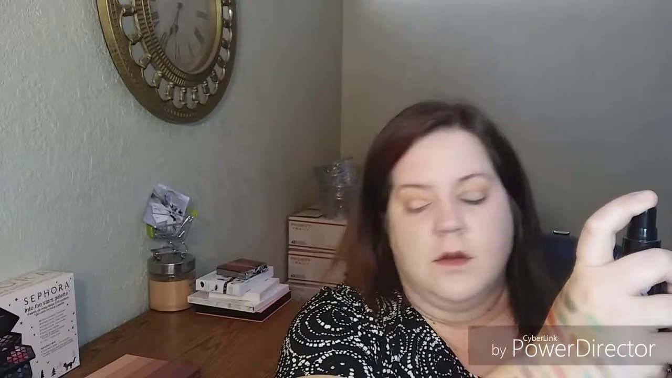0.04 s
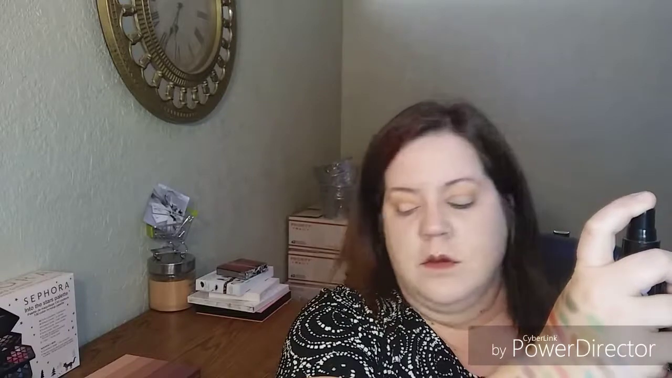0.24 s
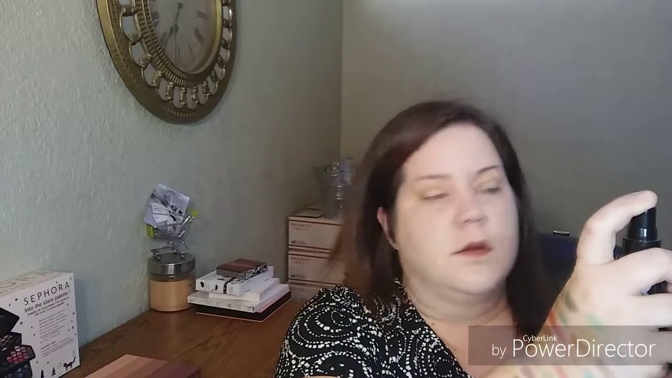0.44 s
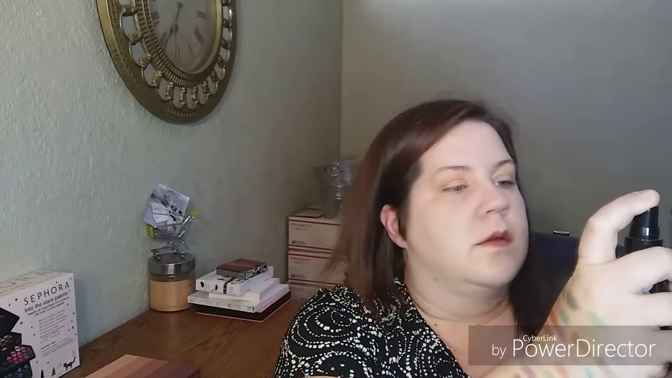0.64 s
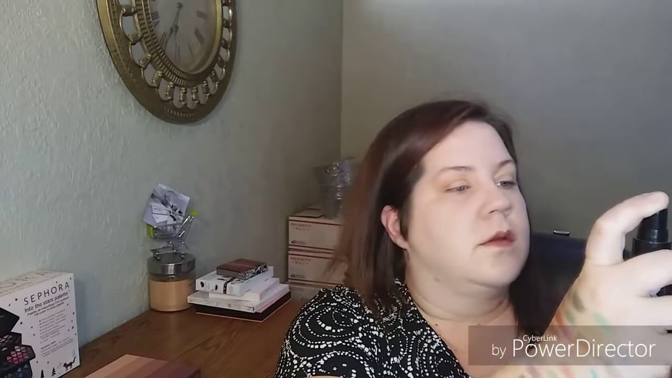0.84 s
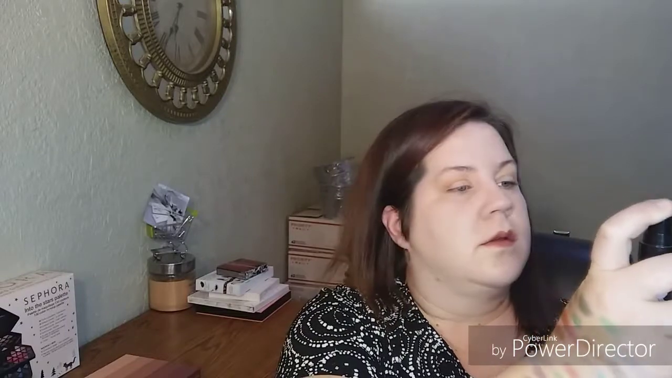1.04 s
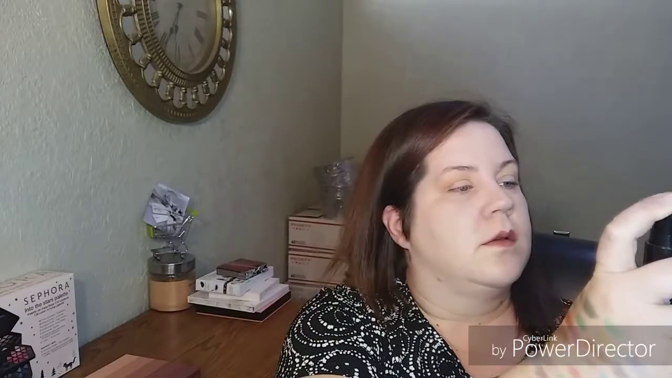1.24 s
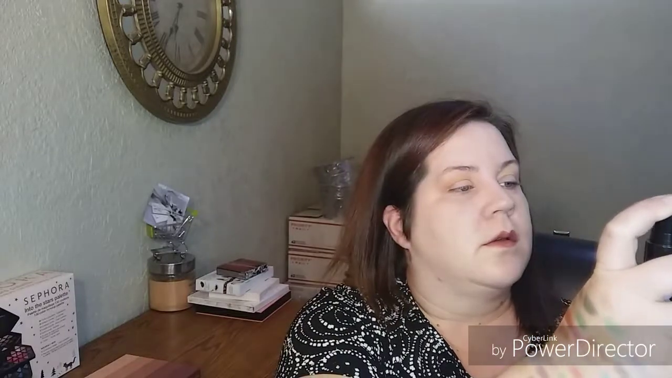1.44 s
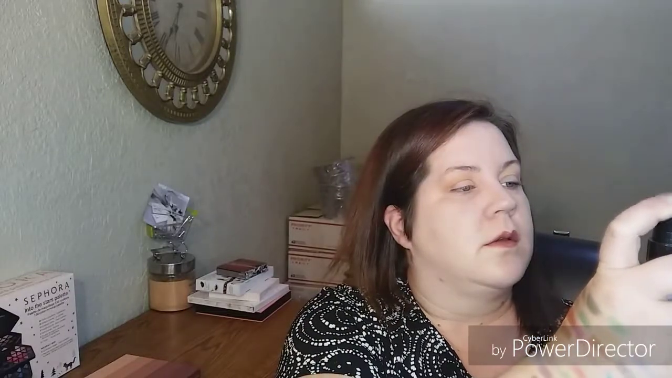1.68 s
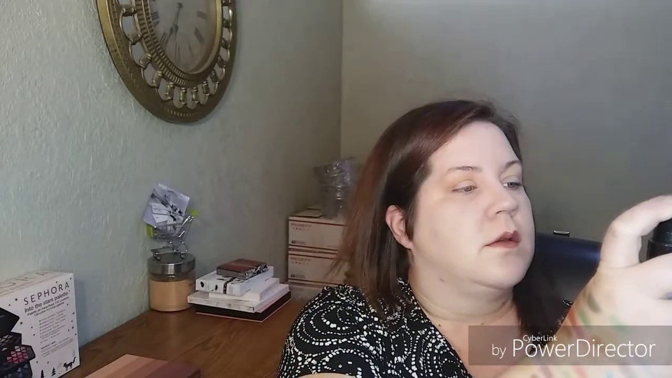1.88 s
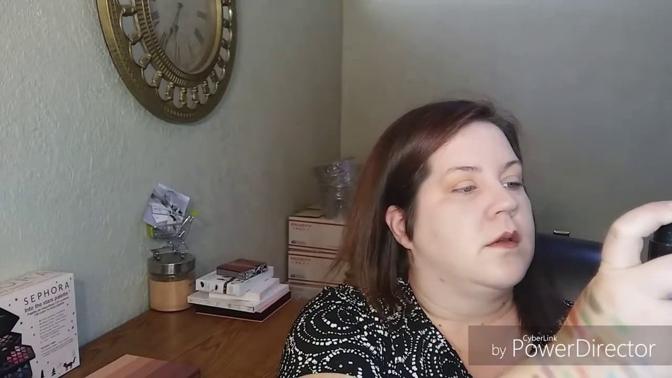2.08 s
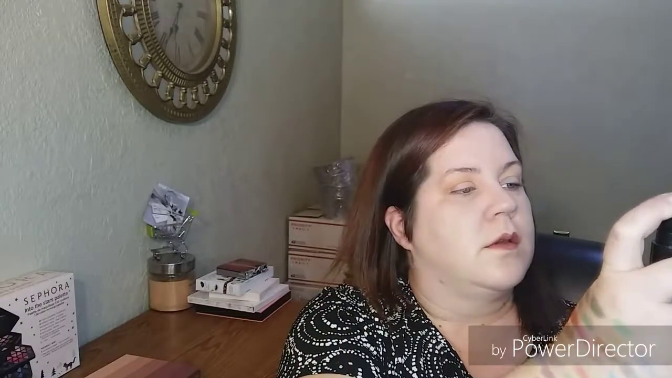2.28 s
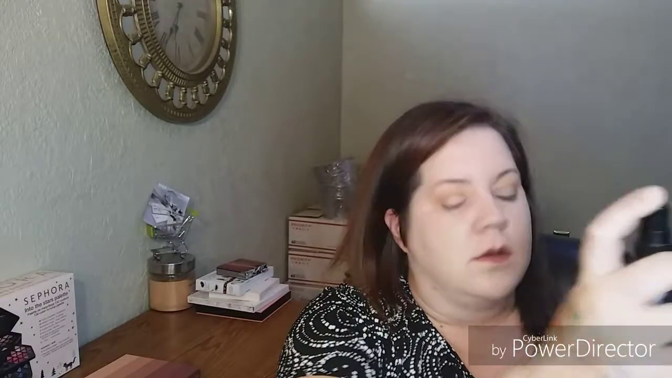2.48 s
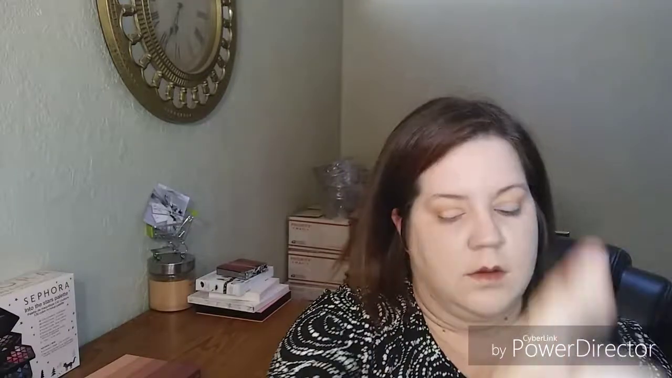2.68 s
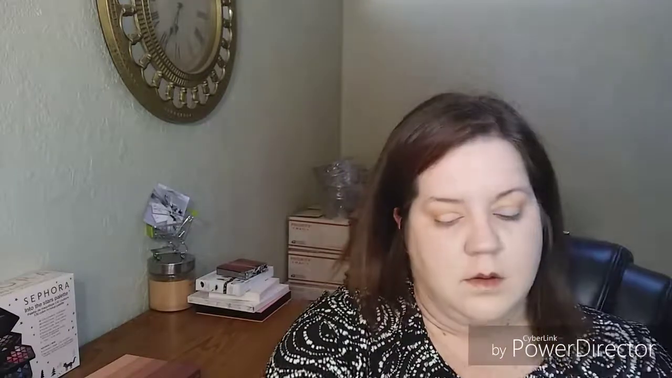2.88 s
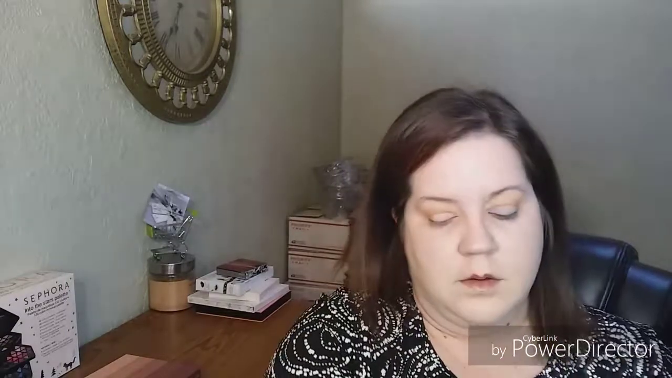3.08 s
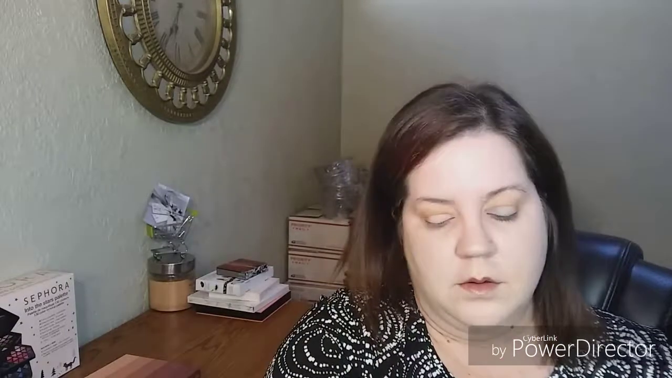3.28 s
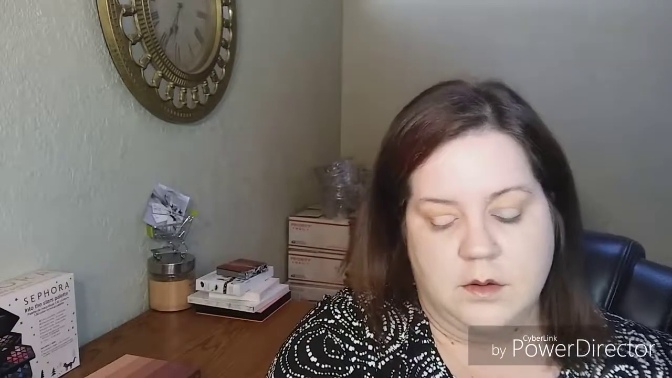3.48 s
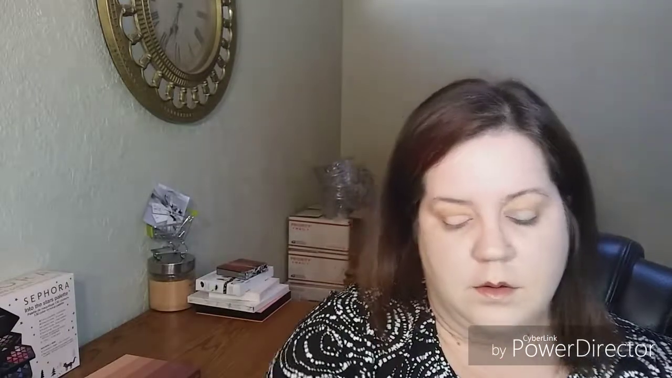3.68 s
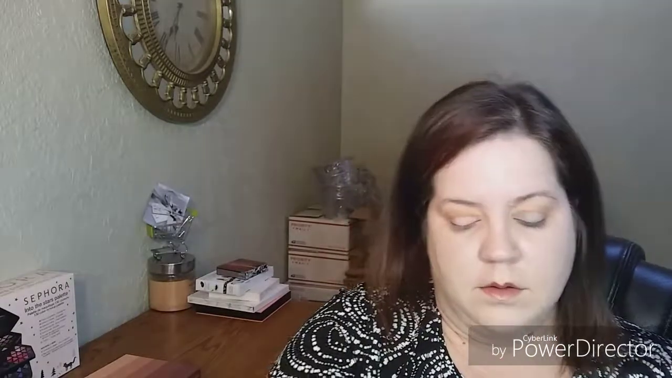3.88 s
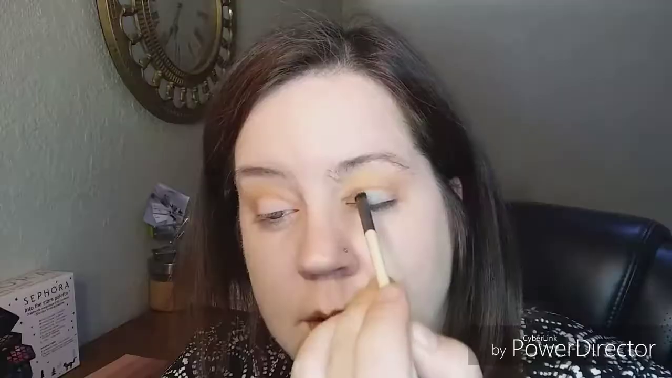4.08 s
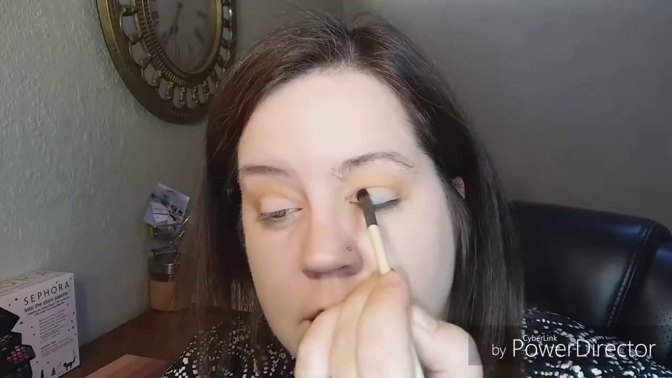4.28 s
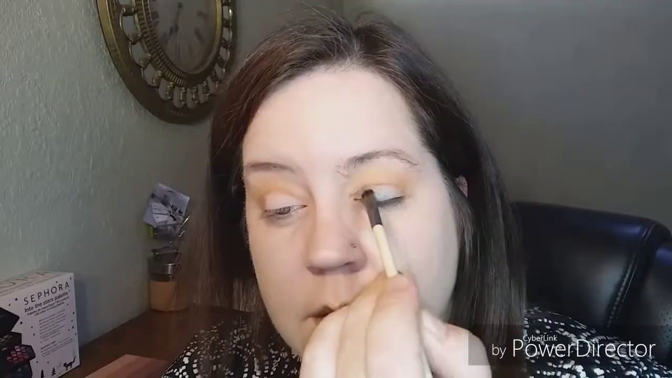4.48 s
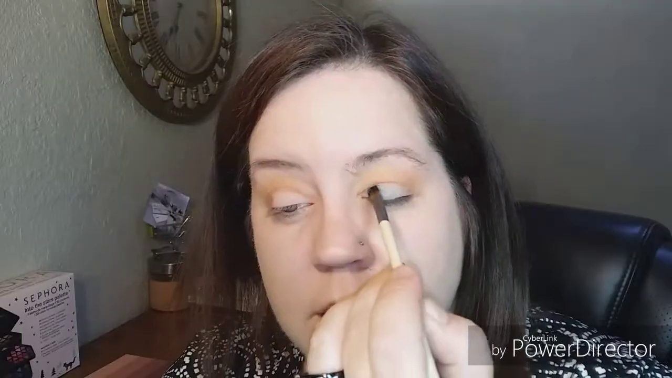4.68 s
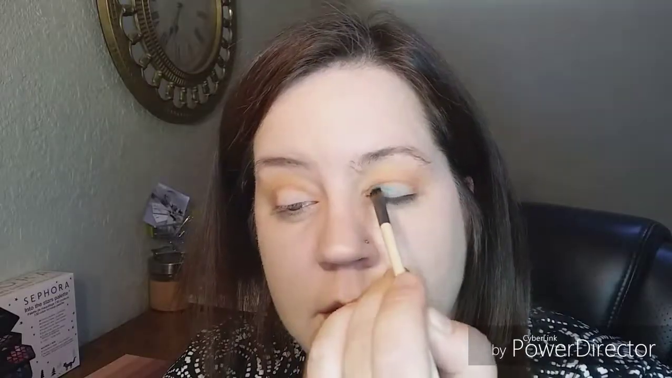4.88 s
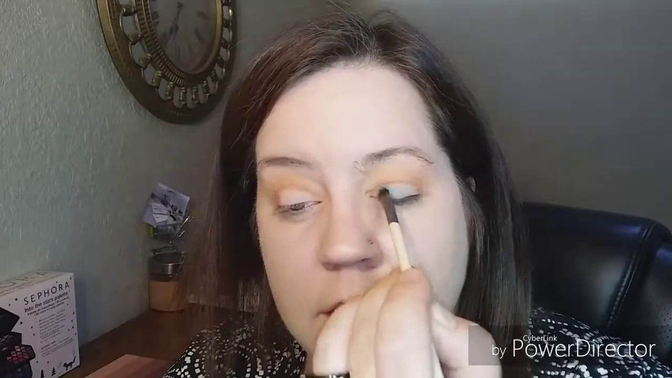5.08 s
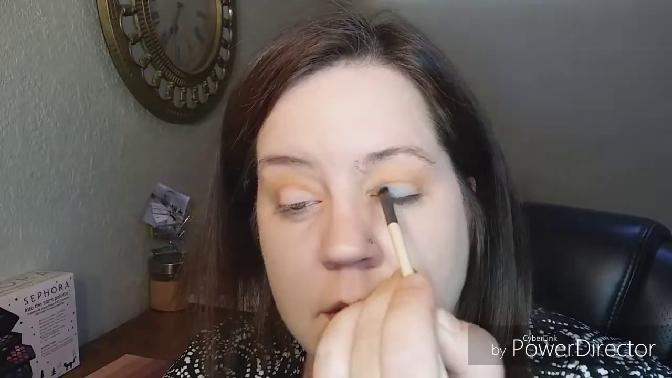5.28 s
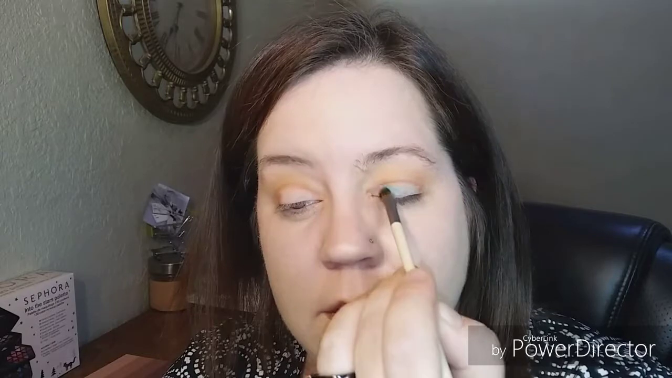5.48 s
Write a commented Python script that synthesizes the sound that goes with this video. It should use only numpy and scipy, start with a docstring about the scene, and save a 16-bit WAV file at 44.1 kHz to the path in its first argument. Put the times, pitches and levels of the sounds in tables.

```python
"""A small room hums steadily with mains and fan tones. Close by, a small pump bottle gives three quick squirts,
each a hissing jet from the nozzle; the first starts with a spit of trapped air. The plunger ticks between
strokes and fingers knock the plastic. The bottle is set down with a thump that rings a wooden desk, then
something scuffs over the wood, sliding and juddering to a stop. One dry, sharp click comes last. The sound is
mono."""
import sys
import numpy as np
from scipy import signal
from scipy.fft import rfft, irfft
from scipy.io import wavfile
from scipy.ndimage import uniform_filter1d

SR = 44100
rng = np.random.default_rng(int(sys.argv[2]) if len(sys.argv) > 2 else 0)


def bounce(signal):
    """Save signal as a 16-bit WAV file at the path given by the first command-line argument."""
    frames = np.transpose(np.atleast_2d(signal))
    limited = np.clip(frames, -1, 1)
    pcm = np.round(limited * 32767).astype(np.int16)
    wavfile.write(sys.argv[1], SR, pcm)


N = 243873
TIME = np.arange(N) / SR

# one row a pump stroke: valve_opens_s, valve_shuts_s, finger_lets_go_s, level_db
PUMP_STROKES = [(1.1075, 1.203, 1.293, -28), (1.572, 1.693, 1.761, -27.7), (1.983, 2.138, 2.206, -28)]
# tone colour of hard contact with the wood: freq_hz, level_db
WOOD_CONTACT = [(150, -8), (600, 11), (1000, 0.5), (1600, -1.5), (2400, -4.5), (3600, -5), (7500, -12),
                (9500, -30), (15000, -32)]


def gain_of(db):
    """Decibels to amplitude."""
    return 10 ** (np.asarray(db) / 20)


def unit_rms(x):
    """Scales to rms 1."""
    return x / np.sqrt(np.mean(abs(x) ** 2) + 1e-20)


def curve_at(points, hz):
    """Reads a curve on a log-frequency axis."""
    point_hz, value = np.transpose(points)
    return np.interp(np.log(hz + 1), np.log(point_hz + 1), value)


def add(mix, start_s, sound):
    """Mixes a sound in at start_s."""
    part = mix[round(start_s * SR):][:len(sound)]
    part += sound[:len(part)]


def noise(colour):
    """Noise of rms 1 with the given tone colour."""
    hz = np.fft.rfftfreq(N, 1 / SR)
    return unit_rms(irfft(rfft(rng.standard_normal(N)) * gain_of(curve_at(colour, hz)), N))


def drift(rate_hz):
    """Smooth random modulation of rms 1, moving at up to about rate_hz."""
    hz = np.fft.rfftfreq(N, 1 / SR)
    return unit_rms(irfft(rfft(rng.standard_normal(N)) / (1 + (hz / rate_hz) ** 4), N))


def ring(modes, tuning=1):
    """Decaying modes after one blow."""
    t = np.arange(SR // 2) / SR
    return sum(gain_of(db - 60 * t / t60) * np.sin(2 * np.pi * hz * tuning * t) for hz, db, t60 in modes)


def burst(start_s, db, decay_s):
    """Envelope that jumps up and dies away."""
    return gain_of(db) * (TIME >= start_s) * np.exp(-abs(TIME - start_s) / decay_s)


def gate(start_s, end_s, attack_s, release_s):
    """Envelope that rises, holds until end_s and dies away."""
    rise = 1 - np.exp(-np.maximum(TIME - start_s, 0) / attack_s)
    return rise * np.exp(-np.maximum(TIME - end_s, 0) / release_s)


def peak_eq(x, peaks):
    """Colours a sound with narrow peaks and notches."""
    hz = np.fft.rfftfreq(N, 1 / SR)
    eq_db = sum(lift * np.exp(-2 * ((hz - centre) / width) ** 2) for centre, width, lift in peaks)
    return irfft(rfft(x) * gain_of(eq_db), N)


def low_cut(x, corner_hz, order=4):
    """A small body radiates little below its corner frequency."""
    return signal.sosfilt(signal.butter(order, corner_hz, "highpass", fs=SR, output="sos"), x)


def room_tone(waver_hz=3.6):
    """Mains and fan tones, each wavering in level and phase, over soft air noise."""
    # moving air and microphone hiss: freq_hz, level_db
    air_colour = [(35, -21), (65, -7), (150, -5.5), (215, 0.5), (400, -2), (700, -6), (1100, -8.5),
                  (2500, -12.5), (5000, -14.5), (7300, -18), (8500, -24), (10500, -22.5), (13000, -19),
                  (15500, -19)]
    # thin whistles in the hiss: centre_hz, width_hz, lift_db
    whistles = [(6380, 200, 2.5), (7160, 200, 4.5)]
    # the tones of the hum: pitch_hz, level_db, waver_share
    hum_tones = [(60, -66.5, 0.1), (119.5, -62.5, 0.91), (195.2, -60, 0.68), (245.5, -60.5, 0.72),
                 (480.4, -64.5, 0.62), (543, -71, 0.9), (768, -75, 0.03), (1015, -71.5, 0.9)]
    out = gain_of(-51.5) * peak_eq(noise(air_colour), whistles) * gain_of(0.58 * drift(7.6))
    for hz, db, waver in hum_tones:
        sway = unit_rms(1 - waver + waver * (drift(waver_hz) + 1j * drift(waver_hz)))
        tone = np.exp(2j * np.pi * (hz * TIME + rng.random()))
        out += gain_of(db) * np.sqrt(2) * (sway * tone).real
    return out


def drone(pitch_hz=361.3, level_db=-58, waver_db=1.5, wobble_rad=0.79, swell_half_s=.11):
    """The hum's leading tone: it wavers in level and phase, and swells twice."""
    # swells of the tone: peak_s, rise_db
    swells = [(0.01, 8), (1.39, 7.5)]
    swell_db = sum(rise_db * np.exp(-((TIME - peak_s) / swell_half_s) ** 2) for peak_s, rise_db in swells)
    level = gain_of(level_db + swell_db + waver_db * drift(3))
    return level * np.sqrt(2) * np.sin(2 * np.pi * pitch_hz * TIME + wobble_rad * drift(3))


def room_reverb(x, wet_db, dull_hz):
    """A small room: sparse reflections, duller than the direct sound, each band dying at its own speed."""
    # the room's decay times: freq_hz, t60_s
    decay_times = [(150, 0.37), (600, 0.47), (2000, 0.8), (5500, 0.37), (9000, 0.54), (15000, 0.4)]
    reflections = rng.choice([-1., 1.], SR) * (rng.random(SR) < 4000 / SR)
    reflections *= np.arange(SR) > .004 * SR  # pre-delay
    hz, t, bands = signal.stft(reflections, SR, nperseg=256)
    bands = bands * gain_of(-60 * t / curve_at(decay_times, hz)[:, None])
    bright_tail = signal.istft(bands, SR, nperseg=256)[1]
    dull_tail = signal.istft(bands / np.hypot(1, (hz / dull_hz) ** 2)[:, None], SR, nperseg=256)[1]
    return gain_of(wet_db) * signal.fftconvolve(x, dull_tail / np.linalg.norm(bright_tail))[:N]


def sharp_click(start_s=4.0478, drive_db=7, cutoff_hz=10900):
    """One sharp spike, rounded off to a few samples wide."""
    spike = np.zeros(N)
    add(spike, start_s, np.array([-gain_of(drive_db)]))
    return signal.lfilter(*signal.butter(2, cutoff_hz, fs=SR), spike)


def desk_scuff(slide_s=3.508, grip_s=3.537, stop_s=3.585, grit_db=2.5, slips_per_s=900):
    """Something slides on the desk with a gritty rub, then sticks and slips, setting the wood droning."""
    # the modes that the judder rings: pitch_hz, level_db, t60_s
    judder_modes = [(183, -12.5, 0.2), (271.3, 2, 0.19), (321, -5, .1), (657, -6, 0.067)]
    rub = unit_rms(noise(WOOD_CONTACT) * gain_of(grit_db * drift(300)))
    slips = rng.standard_normal(N) * (rng.random(N) < slips_per_s / SR)
    judder = signal.oaconvolve(slips, ring(judder_modes))[:N]
    judder /= np.sqrt(abs(uniform_filter1d(judder ** 2, size=1100)) + 1e-9)  # the hand presses evenly
    rub_level = gain_of(-41.5) * gate(slide_s, grip_s + .018, attack_s=.002, release_s=.045)
    judder_level = gain_of(-31) * gate(grip_s, stop_s, attack_s=.007, release_s=.018)
    return rub_level * rub + judder_level * judder


def desk_thump():
    """The bottle's base hits the desk in a cluster of blows; a longer contact rings only the low modes."""
    # the bottle lands and rocks: start_s, body_db, contact_s, contact_noise_db
    blows = [(3.3370, -12, 0.00087, -29), (3.3398, -21, 0.00055, -33), (3.3488, -30, 0.00047, -30.5),
             (3.357, -25, 0.00034, -37), (3.3611, -17.5, 0.0023, -37), (3.3717, -24, 0.00089, -42)]
    # the desk's modes: pitch_hz, level_db, t60_s
    desk_modes = [(166, -22, .25), (207, -13, .17), (243, -9, .14), (283, -4, .09), (365, -4.5, .05),
                  (495, -5.5, .07), (595, -9, .06), (668, -7, .08)]
    out, contact_noise, wood = np.zeros(N), noise(WOOD_CONTACT), ring(desk_modes)
    t = np.arange(400) / SR
    for start_s, body_db, contact_s, noise_db in blows:
        push = np.sin(np.pi * np.minimum(t / contact_s, 1))
        add(out, start_s, gain_of(body_db) * np.convolve(wood, push / push.sum()))
        out += burst(start_s, noise_db, decay_s=0.0036) * contact_noise
    return out


def bottle_knocks(travel_s=.049, detune=0.025):
    """Plunger and fingers knock the hand-damped bottle, ringing it a little differently each time."""
    # finger ticks as the grip shifts: start_s, body_db, snap_db
    finger_ticks = [(1.120, -39, -55), (1.934, -35.5, -63), (1.943, -37.5, -66), (2.581, -55, -48),
                    (2.749, -41, -43), (2.772, -44, -49), (2.829, -60, -49.5)]
    # the bottle's modes: pitch_hz, level_db, t60_s
    bottle_modes = [(440, -12, .02), (570, -5, .025), (660, 0, .04), (780, -7, .02), (1250, -12, .015),
                    (1750, -10, .015), (2200, -8, .018), (3150, -15, .012)]
    # hard plastic snapping: freq_hz, level_db
    snap_colour = [(1000, -10), (3000, -5), (4700, 1), (7000, 2), (9000, -10), (14000, -10), (16000, -22)]
    knocks = list(finger_ticks)
    for opens_s, _, lets_go_s, _ in PUMP_STROKES:
        knocks.append((opens_s, -42.5, -44))  # the plunger is pressed,
        knocks.append((lets_go_s, -44.5, -57))  # let go,
        knocks.append((lets_go_s + travel_s, -45.5, -58))  # and hits the top of its travel
    out, snap = np.zeros(N), noise(snap_colour)
    for (start_s, body_db, snap_db), grip in zip(knocks, rng.uniform(-1, 1, len(knocks))):
        add(out, start_s, gain_of(body_db) * ring(bottle_modes, 1 + detune * grip))
        out += burst(start_s, snap_db, decay_s=0.01) * snap
    return out


def nozzle_spits():
    """Tiny, very high bursts as trapped air leaves the nozzle at the start of the first stroke."""
    # the fizz of a spit: freq_hz, level_db
    fizz_colour = [(7000, -46), (11000, -5), (13300, 2), (14500, 1), (15600, -20)]
    # one row an air bubble: start_s, level_db
    bubbles = [(1.1092, -33), (1.1188, -29), (1.1325, -26)]
    return noise(fizz_colour) * sum(burst(start_s, db, decay_s=0.0021) for start_s, db in bubbles)


def spray_jet(onset_db=-7, build_s=0.019, sag_db=-6, sag_s=.04, attack_s=0.0012, sputter_db=0.5):
    """The valve snaps open, pressure builds, then sags as the plunger bottoms out; the jet sputters."""
    # the hiss of the jet at the nozzle: freq_hz, level_db
    jet_colour = [(300, -57), (1000, -25.5), (1300, -23.5), (1550, -14.5), (2500, -19), (3200, -13),
                  (4100, -10), (4800, -3.5), (6700, -5), (7500, -8), (8900, -18.5), (11500, -16),
                  (13500, -15.5), (15500, -31)]
    flow = np.zeros(N)
    for opens_s, shuts_s, _, level_db in PUMP_STROKES:
        valve = gate(opens_s, shuts_s, attack_s, release_s=0.0025)
        dribble = 0.32 * gate(opens_s, shuts_s, attack_s, release_s=0.033)  # the last liquid fizzles out
        pressure_db = onset_db * np.exp(-np.maximum(TIME - opens_s, 0) / build_s)
        pressure_db += np.interp(TIME, [shuts_s - sag_s, shuts_s], [0, sag_db])
        flow += np.maximum(valve, dribble) * gain_of(level_db + pressure_db)
    return flow * noise(jet_colour) * gain_of(sputter_db * drift(240))


def scene():
    """Bottle and desk with their reverb, over the hum; the click stays dry. Both channels are the same."""
    # peaks and notches on the direct path from the nozzle: centre_hz, width_hz, lift_db
    nozzle_eq = [(2874, 120, 7.5), (3050, 130, 1), (3260, 180, 6.5), (4160, 110, -7), (5100, 350, 1.5),
                 (5480, 140, -7.5), (6600, 520, 5), (7470, 200, -7), (8300, 300, 3), (9640, 300, 7),
                 (10500, 250, 0), (11160, 460, 4.5), (12600, 600, 3.5)]
    # the clack of the bottle's base toward the listener: centre_hz, width_hz, lift_db
    clack_eq = [(2240, 320, 14), (3150, 270, 7), (4640, 340, 1)]
    spray = spray_jet() + nozzle_spits()
    knocks = low_cut(bottle_knocks(), corner_hz=343, order=2)
    thump = low_cut(desk_thump(), corner_hz=143, order=3)
    scuff = low_cut(desk_scuff(), corner_hz=152)
    direct = peak_eq(spray, nozzle_eq) + knocks + peak_eq(thump, clack_eq) + scuff
    reverb = room_reverb(spray, wet_db=-9.0, dull_hz=8800)
    reverb += room_reverb(knocks, wet_db=-5.5, dull_hz=8050)
    reverb += room_reverb(thump + scuff, wet_db=-8.0, dull_hz=2800)
    mono = direct + reverb + room_tone() + drone() + sharp_click()
    return np.array([mono, mono])


def record(dry):
    """A steep high cut takes off the very top of the treble."""
    high_cut = signal.firwin(511, cutoff=15650, window=("kaiser", 9), fs=SR)
    return signal.oaconvolve(dry, high_cut[None], "same")


dry = scene()
out = record(dry)
bounce(out)
```